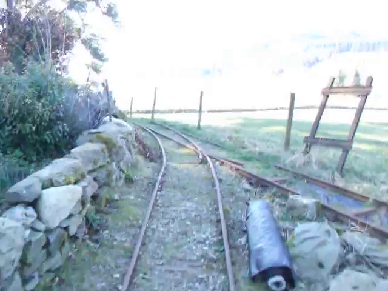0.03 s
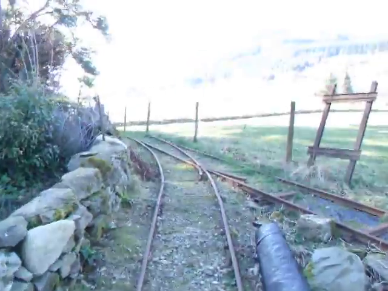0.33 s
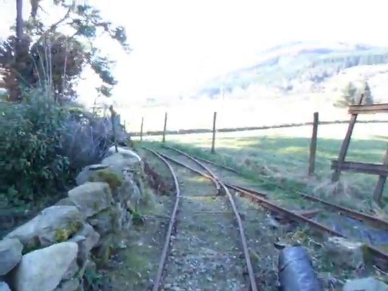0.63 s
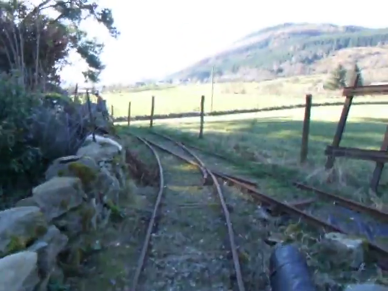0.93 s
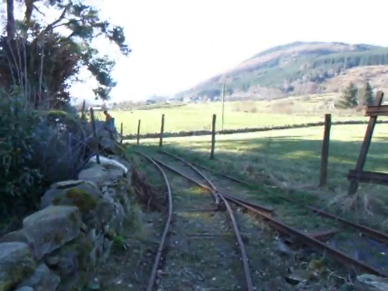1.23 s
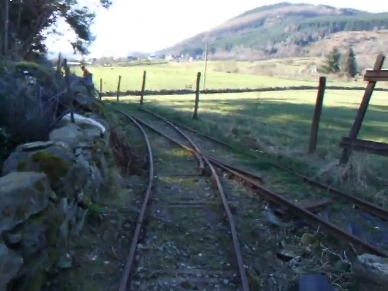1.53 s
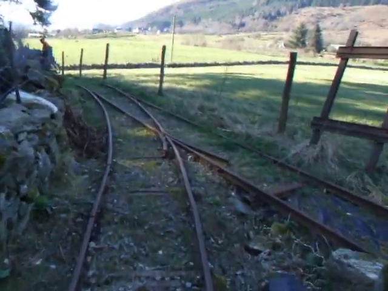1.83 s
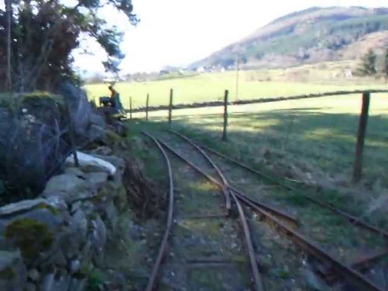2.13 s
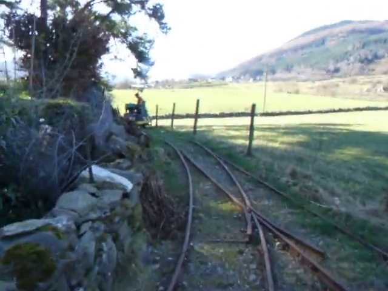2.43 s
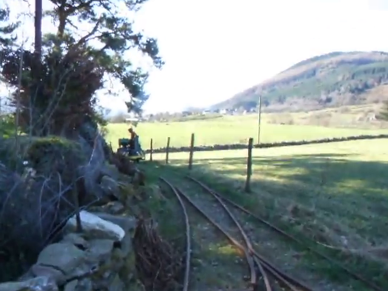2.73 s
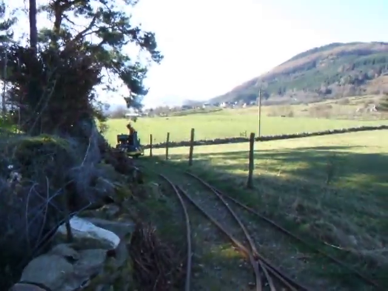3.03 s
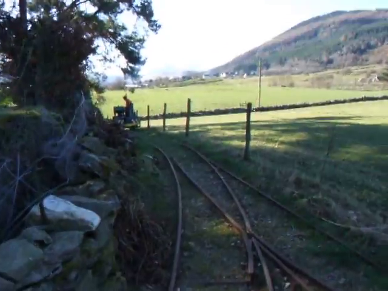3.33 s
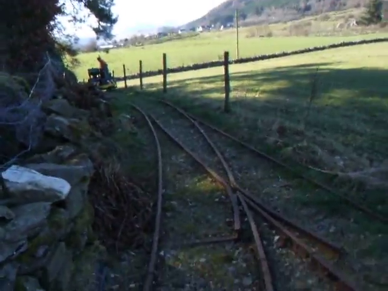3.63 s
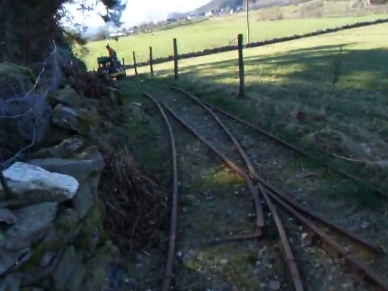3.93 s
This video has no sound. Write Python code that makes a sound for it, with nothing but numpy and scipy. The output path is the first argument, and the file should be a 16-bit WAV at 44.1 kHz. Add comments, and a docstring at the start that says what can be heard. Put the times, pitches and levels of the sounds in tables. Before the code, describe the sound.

Out in open fields, a little diesel locomotive knocks and spits in a gradually quickening rhythm. Rolling noise, a few clinks and soft wind buffets on the microphone lie underneath, before short, high wheel squeals at the close.

```python
"""A knocking, spitting chug: a small two-cylinder diesel locomotive on a narrow-gauge track in open
fields, slowly gaining speed. Each engine cycle has two knocks that ring the block and casing, a sharp
spit of gas with a hissing tail, two exhaust puffs and a valve rattle. Under it are rolling noise,
scuffs, clinks and a faint hum; a wheel flange squeals in the curve, and wind buffets the microphone."""
import sys
import numpy as np
from scipy import signal
from scipy.fft import rfft, irfft
from scipy.io import wavfile

SR = 44100
rng = np.random.default_rng(int(sys.argv[2]) if len(sys.argv) > 2 else 0)


def to_wav(sig):
    """Store sig (one row per channel, or 1-D mono) as 16-bit WAV at the path in sys.argv[1].

    Samples outside -1..1 are clipped; the rate is SR.
    """
    pcm = np.clip(np.atleast_2d(sig), -1, 1) * 32767
    pcm = np.round(pcm).astype(np.int16)
    wavfile.write(sys.argv[1], SR, pcm.T)  # frames by channels


N = 176400
T = np.arange(N) / SR


def from_db(db):
    """Decibels to gain."""
    return 10 ** (np.asarray(db) / 20)


def rms_one(x):
    """Scale to rms 1."""
    return x / np.sqrt(np.mean(x ** 2) + 1e-20)


def level(curve):
    """A fader ride along (seconds, dB) points."""
    return from_db(np.interp(T, *np.transpose(curve)))


def noise(spectrum, ratio=1, grains_per_s=None):
    """Noise, or sparse uneven clicks, through an EQ curve shifted by a frequency ratio."""
    hz, db = np.transpose(spectrum)
    x = rng.standard_normal(N)
    if grains_per_s:
        x = x * (rng.random(N) < grains_per_s / SR)
    bins_hz = np.arange(N // 2 + 1) * SR / N + 1
    eq = from_db(np.interp(np.log(bins_hz), np.log(hz * ratio), db))
    return rms_one(irfft(rfft(x) * eq, N))


def resonant_noise(hz, width_hz):
    """Noise twice through one resonance."""
    r = np.exp(-np.pi * width_hz / SR)
    stage = [1, 0, -1, 1, -2 * r * np.cos(2 * np.pi * hz / SR), r * r]
    return rms_one(signal.sosfilt([stage, stage], rng.standard_normal(N)))


def drift(rate_hz):
    """Smooth random modulation at rms 1."""
    lowpass = signal.butter(2, rate_hz, fs=SR, output="sos")
    return rms_one(signal.sosfilt(lowpass, rng.standard_normal(N + SR))[SR:])


def wavering_tone(hz, width_hz, rate_hz):
    """A sine whose pitch wanders at random."""
    return np.sin(2 * np.pi * np.cumsum(hz + width_hz / 2 * drift(rate_hz)) / SR)


def swell(s, rise, fall=None):
    """Bell-shaped envelope peaking at s, symmetric unless a fall is given."""
    width = np.where(T < s, rise, fall or rise)
    return np.exp(-.5 * np.minimum(((T - s) / width) ** 2, 100))


def decay(s, length):
    """Hard attack, exponential fall."""
    return (T >= s) * np.exp(-np.minimum(np.abs(T - s) / length, 40))


def clicks(times, gains):
    """One impulse per time."""
    out = np.zeros(N + SR)
    np.add.at(out, (times * SR).astype(int), gains)
    return out[:N]


def ring(force, hz, t60):
    """A unit click sets a sine of height 1 ringing."""
    r, w = np.exp(-np.log(1000) / (t60 * SR)), 2 * np.pi * hz / SR
    return signal.lfilter([0, np.sin(w)], [1, -2 * r * np.cos(w), r * r], force + 1e-18)


# Wind rumble. Each row: frequency in Hz, relative level in dB.
WIND_EQ = [(15,-16),(40,2),(80,0.5),(120,-1.5),(200,-14),(400,-28),(900,-41.5),(3000,-64.5)]
# Each row: peak time in seconds, half-width in seconds, level in dB, brightness as a frequency ratio.
BUFFETS = [(0.117,0.022,-35.5,1.3),(.405,0.029,-31,0.79),(0.7,.015,-44,1.1),(0.908,0.022,-34,1.06),(0.957,0.03,-36.5,1.02),(1.196,0.071,-37,1.32),(1.285,0.026,-29,1.2),(1.567,0.029,-33.5,1.24),(1.694,.03,-36,0.87),(1.78,.02,-36.5,0.67),(1.949,.02,-38,0.71),(2.123,0.018,-29.5,0.36),(2.21,0.014,-23.5,1.5),(2.359,0.01,-21,1.96),(2.596,0.045,-41.5,0.61),(2.967,0.032,-45,0.66),(3.283,0.0073,-27.5,1),(3.338,0.027,-33.5,1.8),(3.98,0.018,-38,0.87)]


def wind(breeze_db=-50.5):
    """Low buffets on the microphone over a light breeze."""
    buffets = sum(from_db(db) * swell(s, half) * noise(WIND_EQ, ratio) for s, half, db, ratio in BUFFETS)
    return buffets + from_db(breeze_db) * noise(WIND_EQ)


# Hum fader. Each row: time in seconds, level in dB.
HUM_LEVEL = [(0,-65.5),(2.4,-58.5),(2.8,-49.5),(3.1,-52.5),(3.52,-47.5),(3.75,-57)]


def hum(flutter_db=4):
    """A faint, fluttering midrange tone."""
    flutter = from_db(flutter_db * drift(14))
    return level(HUM_LEVEL) * flutter * wavering_tone(hz=716.4, width_hz=18.7, rate_hz=20)


# Rolling bed. Each row: frequency in Hz, relative level in dB.
ROLLING_EQ = [(25,-3),(60,5),(110,2.5),(220,-2),(350,0),(550,-3),(900,-1.5),(1400,-5.5),(2100,-4.5),(2700,-5.5),(3050,-3),(3600,-9),(4600,-5.5),(5500,-7.5),(7300,-10.5),(8600,-13.5)]
# Its fader. Each row: time in seconds, level in dB.
ROLLING_LEVEL = [(0,-41.5),(.5,-43),(1.2,-41),(2,-41),(2.7,-43),(3.4,-39.5),(3.7,-38),(4,-44.5)]


def rolling(rough_db=2.28):
    """The running gear lays down a rough, steady bed of noise."""
    return level(ROLLING_LEVEL) * noise(ROLLING_EQ) * from_db(rough_db * drift(60))


# Dull rattle colour. Each row: frequency in Hz, relative level in dB.
RATTLE_EQ = [(300,-5),(700,-0.5),(1100,-1),(1400,2),(1900,-4.5),(3000,-19),(8000,-33.5)]


def rattle_noise(rough_db=3):
    """The gritty midrange texture of valves and loose parts."""
    return rms_one(noise(RATTLE_EQ) * from_db(rough_db * drift(250)))


# Each row: peak time in seconds, half-width in seconds, level in dB.
SCUFFS = [(0.066,.003,-38),(0.096,0.019,-41),(0.27,0.005,-61),(.382,0.0011,-37),(0.479,0.0057,-51),(0.664,0.0098,-42),(0.91,.008,-50),(1.123,0.012,-46),(1.319,0.0093,-40),(2.212,0.015,-45),(3.048,0.023,-41.5),(3.35,0.011,-47)]
# Each row: start in seconds, level in dB, centre in Hz, decay in seconds.
CLINKS = [(.081,-25.5,4550,.002),(.381,-29,3800,0.0033),(0.652,-25.5,5400,0.008),(.671,-32,5960,0.0051),(2.916,-23.5,5100,0.00067)]


def loose_parts():
    """Loose parts give dull scuffs and sharp clinks."""
    scuffs = sum(from_db(db) * swell(s, half) for s, half, db in SCUFFS) * rattle_noise()
    return scuffs + sum(from_db(db) * decay(s, length) * resonant_noise(hz, width_hz=2500)
                        for s, db, hz, length in CLINKS)


# Each row: peak time in seconds, half-width in seconds, pitch in Hz, level in dB.
SQUEALS = [(2.567,0.0057,6520,-36),(2.91,0.024,7800,-59),(2.902,0.028,8450,-61),(3.845,0.0071,6600,-23.5),(3.873,0.018,6570,-27),(3.9,0.018,6580,-45),(3.95,0.014,6620,-37.5),(3.985,0.0053,6650,-30),(4.0,0.0049,6516,-33)]


def wheel_squeal(wander_hz=6.9):
    """A flange rubs the rail in short, nearly pure chirps."""
    wander = wander_hz * np.cumsum(drift(60)) / SR
    return np.sqrt(2) * sum(from_db(db) * swell(s, half) * np.sin(2 * np.pi * (hz * T + wander))
                            for s, half, hz, db in SQUEALS)


# The engine's rhythm, two turns to a cycle.
# Each row: start in seconds, then relative levels in dB of first knock, second knock and spit.
CYCLES = [(0.077,-39.5,-36,-28.5),(.300,-35.5,-37.5,-29),(.519,-38.5,-38,-31),(.734,-35.5,-43,-25.5),(0.948,-36,-36,-25.5),(1.159,-35,-34,-25),(1.367,-36.5,-40,-27),(1.573,-39.5,-36.5,-24),(1.775,-41,-37.5,-21.5),(1.975,-33,-28,-22.5),(2.171,-33,-27,-21.5),(2.365,-30.5,-28,-21.5),(2.555,-30,-27.5,-26),(2.746,-31.5,-28,-28),(2.935,-31,-29,-28.5),(3.121,-31,-30,-35),(3.307,-35,-32,-27.5),(3.494,-34.5,-32,-38),(3.680,-36,-35.5,-31),(3.866,-34.5,-36.5,-38)]
LAST_CYCLE_S = .186


def cycle_times(share):
    """The moment in every cycle when the given share of it has passed."""
    starts = np.array(CYCLES)[:, 0]
    return starts + share * np.append(np.diff(starts), LAST_CYCLE_S)


# Valve ring fader. Each row: time in seconds, level in dB.
VALVE_RING_LEVEL = [(0,-76),(.8,-50.5),(1.2,-51.5),(2.4,-47.5),(3,-57.5),(4,-46.5)]


def valves(rattle_db=-48.5, half_width_s=0.0069):
    """The valves rattle late in each cycle, over a continuous noisy ring."""
    bursts = from_db(rattle_db) * sum(swell(s, half_width_s) for s in cycle_times(0.826))
    return bursts * rattle_noise() + level(VALVE_RING_LEVEL) * resonant_noise(hz=1380, width_hz=380)


# Exhaust strokes. Each row: position as a share of the cycle, accent in dB.
PUFFS = [(0.078,1),(0.323,1)]
# Their drive. Each row: time in seconds, gain in dB.
PUFF_DRIVE = [(0,10),(1,12.5),(2.7,13),(3.2,14),(4,16)]
# Pipe resonances. Each row: pitch in Hz, gain in dB, time to fade 60 dB in seconds.
PIPE_MODES = [(55,-63,0.094),(133,-60,0.066),(225,-58.5,0.2)]


def exhaust(scatter_db=1, silencer_hz=(165, 254.6), drone_db=-49):
    """Two unevenly spaced puffs a cycle pass the silencer and faintly ring the pipe, over a drone."""
    puffs = sum(clicks(cycle_times(share), from_db(db + scatter_db * rng.standard_normal(len(CYCLES))))
                for share, db in PUFFS)
    force = level(PUFF_DRIVE) * puffs
    thumps = signal.sosfilt(signal.butter(2, silencer_hz, "band", fs=SR, output="sos"), force + 1e-18)
    pipe = sum(from_db(db) * ring(force, hz, t60) for hz, db, t60 in PIPE_MODES)
    return thumps + pipe + from_db(drone_db) * resonant_noise(hz=215.3, width_hz=34)


# Bright colour of hiss and crackle. Each row: frequency in Hz, relative level in dB.
HISS_EQ = [(1000,-22.5),(2300,-12),(3050,9.5),(3700,-7),(4600,-0.5),(5700,7),(7200,5.5),(8500,-14)]


def crackle(db=-56.5):
    """A faint sprinkle of bright ticks."""
    return from_db(db) * noise(HISS_EQ, grains_per_s=90)


# Hiss fader. Each row: time in seconds, level in dB.
HISS_LEVEL = [(0,-49.5),(.8,-43.5),(2.4,-42),(3.2,-49.5),(3.7,-41.5),(4,-43.5)]


def gas_hiss():
    """A soft hiss of gas trails each spit, peaking a third of the way through the cycle."""
    trails = sum(swell(s, 0.26 * LAST_CYCLE_S) for s in cycle_times(0.33))
    return trails * level(HISS_LEVEL) * noise(HISS_EQ)


# Spit colour. Each row: frequency in Hz, relative level in dB.
SPIT_EQ = [(300,-21.5),(1000,-12.5),(1700,-10),(2300,-14),(3150,2.5),(3750,-9),(4250,0),(4800,-2.5),(5450,3),(6000,-1),(6650,0.5),(7400,-2),(8200,-9),(9000,-4.5)]


def gas_spit(delay_s=0.017, rise_s=0.0058, fall_s=0.0059, trim_db=0.5, rough_db=1.5, grain_db=-5):
    """A sharp, gritty spit of gas follows each cycle's first knock."""
    bursts = sum(from_db(db + trim_db) * swell(s + delay_s, rise_s, fall_s) for s, _, _, db in CYCLES)
    rush = noise(SPIT_EQ) * from_db(rough_db * drift(500))
    grains = from_db(grain_db) * noise(SPIT_EQ, grains_per_s=2500)
    return bursts * rms_one(rush + grains)


# Casing ring fader. Each row: time in seconds, gain in dB.
CASING_LEVEL = [(0,1.5),(2.8,-3),(3.3,-6),(3.6,-20),(4,-17)]


def casing_ring(times, gains, hz=3047, width_hz=106.7, flutter_db=4, tail_db=-7.5):
    """The casing blooms just after each knock, then rings on more softly."""
    delay_s, bloom_s, tail_s = 0.0084, 0.0032, 0.041
    blooms = sum(g * swell(s + delay_s, bloom_s) * (T >= s) for s, g in zip(times, gains))
    tone = rms_one(wavering_tone(hz, width_hz, rate_hz=153.4) * from_db(flutter_db * drift(250)))
    tails = from_db(tail_db) * sum(g * decay(s, tail_s) for s, g in zip(times, gains))
    return level(CASING_LEVEL) * (blooms * tone + tails * resonant_noise(hz, width_hz))


# Engine block resonances. Each row: pitch in Hz, relative level in dB, time to fade 60 dB in seconds.
BLOCK_MODES = [(1403,-14.5,0.018),(1596,-9.5,0.014),(1980,-16,0.0099),(2250,-18,0.017),(2780,-4.5,0.008),(3054,-11.5,0.071),(3073,-18.5,0.064),(3300,-12,0.011),(3602,-12.5,0.03),(4170,-11,0.013),(4680,-12,0.025),(4836,-7.5,.018),(6000,-8.5,0.016)]
# How hard the block is hit. Each row: time in seconds, first and second knock's extra gain in dB.
HARDNESS = [(0,-2.5,-5),(1.299,2,-3.5),(1.699,2,-0.5),(2.2,4.5,-1.5),(2.999,0,-2),(3.5,6.5,4),(4,6,8)]


def knocks(trim_db=5.5, scatter_db=2, band_hz=(1000, 5500)):
    """Once a turn a blow and a brief chatter strike the block, and the casing rings on."""
    chatter_per_s, chatter_db, chatter_s = 2500, -7.5, 0.0062
    first, second = cycle_times(0), cycle_times(.5)
    times = np.concatenate([first, second])
    gains = from_db(np.array(CYCLES)[:, 1:3].T.ravel())
    at, first_db, second_db = np.transpose(HARDNESS)
    hits = gains * from_db(np.append(np.interp(first, at, first_db), np.interp(second, at, second_db)))
    chatter = from_db(chatter_db) * sum(g * decay(s, chatter_s) for s, g in zip(times, hits))
    chatter *= rng.random(N) < chatter_per_s / SR
    block = 0
    for k, (hz, db, t60) in enumerate(BLOCK_MODES):
        blows = (-1) ** k * clicks(times, hits * from_db(scatter_db * rng.standard_normal(len(times))))
        block += from_db(db + trim_db) * ring(blows + chatter * rng.standard_normal(N), hz, t60)
    block = signal.sosfilt(signal.butter(2, band_hz, "band", fs=SR, output="sos"), block)
    return block + casing_ring(times, gains)


# Slaps off ground, wall and bank. Each row: delay in seconds, gain in dB.
ECHOES = [(0.012,-16),(0.03,-30),(0.045,-22)]


def scene():
    """The mono mix, with outdoor echoes on the knocks and gas only."""
    bed = wind() + hum() + rolling() + loose_parts() + crackle()
    clatter = gas_hiss() + gas_spit() + knocks()
    echoes = sum(from_db(db) * np.interp(T - delay, T, clatter, left=0) for delay, db in ECHOES)
    return (bed + wheel_squeal() + valves() + exhaust() + clatter + echoes)[None]


def record(dry, start_s=.035, edge_hz=8200, stop_hz=9300):
    """A small camera microphone: silent for an instant, then open with the top end steeply cut."""
    soft = signal.sosfilt(signal.butter(10, edge_hz, fs=SR, output="sos"), dry * (T >= start_s))
    return signal.sosfilt(signal.cheby2(16, 65, stop_hz, fs=SR, output="sos"), soft)


dry = scene()
out = record(dry)
to_wav(out)
```